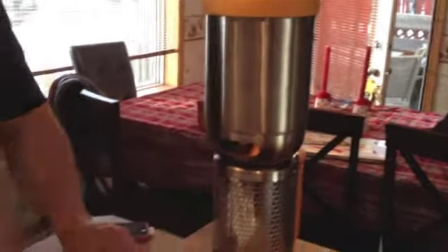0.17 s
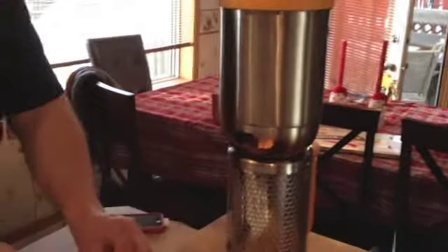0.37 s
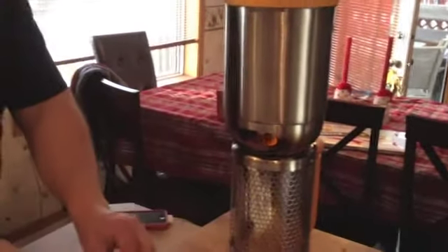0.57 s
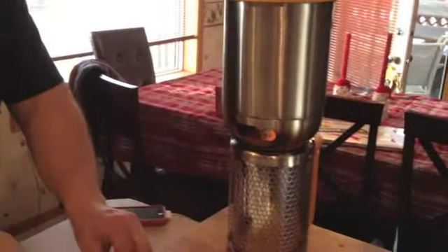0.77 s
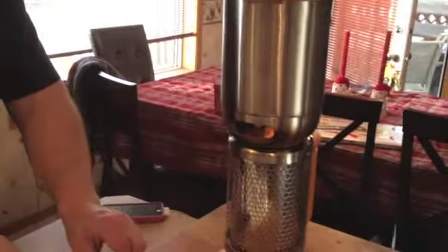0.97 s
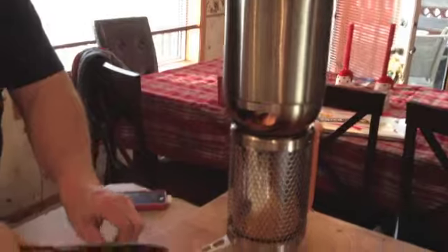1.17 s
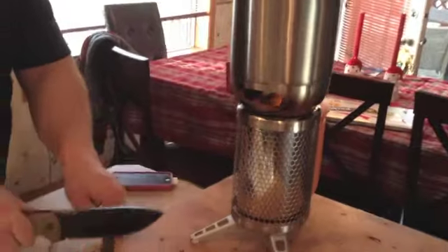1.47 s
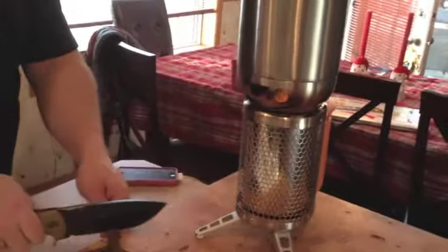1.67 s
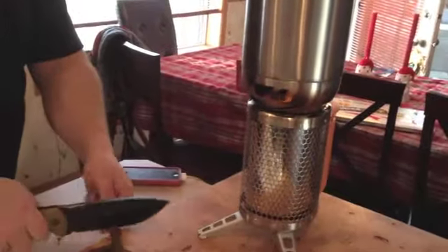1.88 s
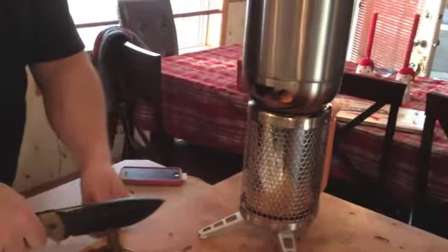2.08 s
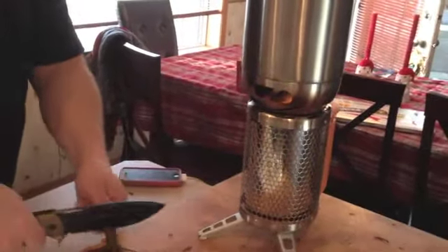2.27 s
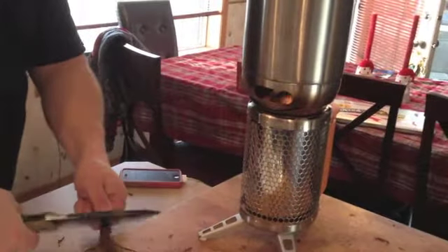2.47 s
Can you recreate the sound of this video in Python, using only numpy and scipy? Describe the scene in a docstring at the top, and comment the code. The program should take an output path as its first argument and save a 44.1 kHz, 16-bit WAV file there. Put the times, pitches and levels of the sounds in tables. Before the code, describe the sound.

One sharp knock cracks on a wood table, then light clicks, while a little stove fan whirs

```python
"""Indoors, on a wooden table, a small camp stove burns: its fan is rushing noise, narrow tones and a thin whine.
One hard knock lands on the tabletop: a sharp crack, ringing wood modes, a noise-built room tail, a steel rattle.
A few light clicks and tiny ticks are short rings with noisy snaps; one faint rustle is a swell of bright hiss.
Automatic gain control ducks after the knock and slowly lets the fan swell back."""
import sys
import numpy as np
from scipy import signal
from scipy.fft import rfft, irfft
from scipy.io import wavfile
from scipy.ndimage import uniform_filter1d

SR = 44100
rng = np.random.default_rng(int(sys.argv[2]) if len(sys.argv) > 2 else 0)


def to_wav(sig):
    """Store sig (one row per channel, or 1-D mono) as 16-bit WAV at the path in sys.argv[1].

    Samples outside -1..1 are clipped; the rate is SR.
    """
    pcm = np.clip(np.atleast_2d(sig), -1, 1) * 32767
    pcm = np.round(pcm).astype(np.int16)
    wavfile.write(sys.argv[1], SR, pcm.T)  # frames by channels


N = 114660  # samples, 2.6 s

# Colour of the air rushing through the stove: hz, relative_db_per_hz
AIR_SPECTRUM = [(30, -70), (60, -65), (90, -25.5), (125, -15), (175, -2), (220, -5.5), (350, -2.5),
                (550, -2.5), (780, -2.5), (1050, -8.5), (1450, -12.5), (2100, -14.5), (2800, -18),
                (3400, -21), (4500, -22.5), (5400, -28.5), (7500, -32), (9300, -40), (12000, -43.5),
                (15000, -41)]
AIR_DB, FLUTTER_DB, FLUTTER_HZ = -45.5, 0.79, 18
# Strength of the draught: time_s, level_db
DRAUGHT = [(0, -0.5), (.6, -0.5), (1.1, 0.5), (1.8, 0), (2.35, .5), (2.6, 0)]
# Narrow tones of the fan and steel burner: pitch_hz, half_width_hz, level_db (before the draught)
WHIR_TONES = [(176.7, 27, -59), (275, 17, -60), (360, 14, -65), (457.8, 1.7, -58), (490.7, 2.6, -56.5),
              (597.5, 10, -61.5), (706, 17, -60.5), (772.6, 11.5, -58), (812, 15, -79.5),
              (1708, 4.7, -68.5), (2920, 17, -70.5), (3940, 24, -74.5)]
WHIR_FOLLOWS = 2.8  # dB of the tones per dB of draught
# Level of the motor's whine, before its flicker: time_s, level_db
WHINE_LEVEL = [(0, -61), (.9, -61.5), (1.25, -59), (1.5, -62.5), (1.7, -80), (2.6, -67)]
WHINE_HZ, WHINE_WANDER_HZ, WHINE_WANDER_RATE_HZ = 1921, 3.5, 6.7
WHINE_FLICKER_DB, WHINE_FLICKER_RATE_HZ = 0.8, 36

# A faint bright rustle: time_s, level_db
RUSTLE_LEVEL = [(1.22, -93), (1.34, -70), (1.46, -86), (1.58, -92)]
RUSTLE_HZ = 12000

# How fast the room's late ring dies: hz, t60_s
ROOM_DECAY = [(60, 0.57), (200, 0.64), (500, 0.46), (1200, 0.54), (2500, 0.37), (6000, 0.27), (13000, 0.19)]
TAIL_BUILD_S = 0.0005
EARLY_DB, EARLY_T60_S = 5, 0.11  # reflections from near surfaces, above the late ring

# Tiny ticks, probably from the burning wood: start_s, ring_db, snap_db
TICKS = [(.560, -72, -52), (1.080, -69, -54), (1.325, -60, -55), (1.5664, -43.5, -59), (1.9045, -56, -51),
         (1.934, -52, -55), (2.088, -60, -55)]
# What a tick rings with: pitch_hz, relative_db, t60_s
TICK_MODES = [(4070, 0, 0.0056), (8260, -6, .008), (9600, -7, 0.0045), (14500, -10, 0.0023)]
# Light clicks of hard things on the table: start_s, ring_db, snap_db
CLICKS = [(.3072, -43, -29), (2.5003, -52, -43), (2.5079, -53, -46), (2.5094, -22, -39)]
# What a click rings with: pitch_hz, relative_db, t60_s
CLICK_MODES = [(2550, -17, 0.01), (4040, -2.5, 0.0034), (4550, -1, 0.0041), (5800, -11, 0.0021),
               (7700, -13, 0.0038), (10500, -29, 0.0041)]
# Colour of the room's answer to small contacts: hz, relative_db_per_hz
CONTACT_TAIL = [(300, -26), (1500, -12), (4300, 0.5), (7200, -2), (9500, -11), (12000, -11), (15000, -15)]
TICK_ROOM_DB, CLICK_ROOM_DB = -22, -31  # relative to each contact
SNAP_T60_S, SNAP_LOW_HZ, SNAP_HIGH_HZ = 0.014, 2200, 10600

# Colour of the steel stove's brief buzz after the knock: hz, relative_db_per_hz
RATTLE_SPECTRUM = [(700, 1), (1500, 9), (2800, 3), (4500, -0.5), (7000, -6), (9500, -15), (11500, -18),
                   (14000, -19)]
RATTLE_DB, RATTLE_HOLD_S, RATTLE_T60_S = -40.5, 0.12, 0.23
RATTLE_TOUCHES_PER_S = 16000

KNOCK_S, TABLE_LAG_S = 0.225, 0.00129
PUSH_LOW_HZ, PUSH_HIGH_HZ = 84, 1510
# The hard contact: pitch_hz, level_db, t60_s
CRACK_MODES = [(2097, -7.5, 0.02), (2550, -2.5, 0.0054), (3740, -7.5, 0.007), (4400, -6.5, 0.0058),
               (5060, -10, 0.0073), (7000, -12.5, 0.003), (13800, -21, 0.0072)]
# The tabletop and what stands on it: pitch_hz, relative_db, t60_s
TABLE_MODES = [(38, -33, 0.16), (139.7, -25, 0.39), (166.2, -19, 0.38), (195, -12.5, 0.19),
               (233, -6, 0.067), (259.7, -20, 0.31), (286.5, -19, 0.26), (354.3, -16, .16),
               (426, -19, 0.35), (480, -20.5, 0.25), (557.4, -21.5, 0.34), (743, -27, 0.27),
               (1000, -40, 0.31), (1170, -23.5, 0.45), (1518, -20, 0.1)]
# Colour of the room's answer to the knock: hz, relative_db_per_hz
KNOCK_TAIL = [(30, -32), (70, -31), (130, -2.5), (230, -2.5), (480, 2), (700, -3), (1150, -5.5),
              (1400, -11), (2200, -10.5), (3000, -17.5), (4500, -23), (7000, -26), (9500, -36),
              (11500, -54), (13500, -39), (16000, -57)]
KNOCK_TAIL_DB = -17

# The gain falls by the slope in dB for each dB above the threshold
GAIN_THRESHOLD_DB, GAIN_SLOPE = -23, 0.5
GAIN_LAG_S, GAIN_ATTACK_S, GAIN_RELEASE_DB_PER_S = 0.037, 0.071, 4.5
CEILING, CUTOFF_HZ = 0.71, 15500


def from_db(db):
    """Decibels to gain."""
    return 10 ** (np.asarray(db) / 20)


def rms_one(x):
    """Scale to unit rms."""
    return x / np.sqrt(np.mean(x ** 2) + 1e-20)


def seconds():
    """The time of every sample."""
    return np.arange(N) / SR


def at_time(points):
    """Draw a straight-line envelope through (time, value) points."""
    return np.interp(seconds(), *np.transpose(points))


def at_hz(points, hz):
    """Read a table on a log-frequency axis."""
    table_hz, value = np.transpose(points)
    return np.interp(np.log(np.maximum(hz, 1)), np.log(table_hz), value)


def coloured(x, shape):
    """Weight a signal's spectrum by shape(Hz), then scale to unit rms."""
    hz = np.fft.rfftfreq(N, 1 / SR)
    return rms_one(irfft(rfft(x) * shape(hz), N))


def noise(shape):
    """Steady noise of unit rms, coloured by shape(Hz)."""
    return coloured(rng.standard_normal(N), shape)


def drift(rate_hz):
    """Slow random motion of unit rms, weaker above the rate."""
    return noise(lambda f: 1 / (1 + (f / rate_hz) ** 2))


def strikes(rows):
    """One impulse for each (start_s, level_db)."""
    force = np.zeros(N)
    for start_s, level_db in rows:
        force[int(np.clip(start_s * SR, 0, N - 1))] += from_db(level_db)
    return force


def ring(force, modes):
    """Damped resonances driven by a force, with alternating signs."""
    out = np.zeros(N)
    for k, (hz, level_db, t60) in enumerate(modes):
        r = np.exp(-np.log(1000) / (t60 * SR))
        w = 2 * np.pi * hz / SR
        mode = signal.lfilter([0, np.sin(w)], [1, -2 * r * np.cos(w), r * r], force + 1e-18)
        out += (-1) ** k * from_db(level_db) * mode
    return out


def fan():
    """Fluttering air and narrow wavering tones follow the draught; the motor whines above them."""
    draught_db = at_time(DRAUGHT)
    air_db = AIR_DB + draught_db + FLUTTER_DB * drift(FLUTTER_HZ)
    air = from_db(air_db) * noise(lambda f: from_db(at_hz(AIR_SPECTRUM, f)))

    whir = np.zeros(N)
    for hz, width, level_db in WHIR_TONES:
        whir += from_db(level_db) * noise(lambda f: 1 / (1 + ((f - hz) / width) ** 2))
    whir *= from_db(WHIR_FOLLOWS * draught_db)

    whine_hz = WHINE_HZ + WHINE_WANDER_HZ * drift(WHINE_WANDER_RATE_HZ)
    whine_db = at_time(WHINE_LEVEL) + WHINE_FLICKER_DB * drift(WHINE_FLICKER_RATE_HZ)
    turns = np.cumsum(whine_hz) / SR
    whine = np.sqrt(2) * from_db(whine_db) * np.sin(2 * np.pi * turns)  # root 2: the level is rms
    return air + whir + whine


def rustle():
    """A short swell of very fine hiss."""
    hiss = noise(lambda f: 1 / (1 + (2 * (f / RUSTLE_HZ - 1)) ** 4))
    return from_db(at_time(RUSTLE_LEVEL)) * hiss


def room(force, spectrum):
    """Dense reflections of each blow: a quick early part, then every octave dies at its own rate."""
    r = np.exp(-1 / (TAIL_BUILD_S * SR))
    energy = signal.lfilter([1 - r], [1, -r], force ** 2 + 1e-18)

    def dying(t60):
        return signal.lfilter([1], [1, -np.exp(-2 * np.log(1000) / (t60 * SR))], energy)

    early = from_db(EARLY_DB) ** 2 * dying(EARLY_T60_S)
    wash = rfft(noise(lambda f: from_db(at_hz(spectrum, f))))
    octave = np.log2(np.maximum(np.fft.rfftfreq(N, 1 / SR), 1))
    out = np.zeros(N)
    for k in range(5, 15):  # overlapping octaves centred from 32 Hz to 16 kHz
        band = irfft(wash * np.maximum(1 - abs(octave - k), 0), N)
        late = dying(at_hz(ROOM_DECAY, 2 ** k))
        out += band * np.sqrt(early + late)
    return out


def snap(force):
    """The brief broad rasp of two hard surfaces meeting: decaying, band-passed noise."""
    t = seconds()[:SR // 20]
    burst = rng.standard_normal(len(t)) * np.exp(-np.log(1000) * t / SNAP_T60_S)
    band = signal.butter(1, [SNAP_LOW_HZ, SNAP_HIGH_HZ], "band", fs=SR)
    return signal.lfilter(*band, signal.fftconvolve(force, burst)[:N])


def contacts(rows, modes, room_db):
    """Each contact is a short ring, a snap and a faint wash of room."""
    rows = np.array(rows)
    blows = strikes(rows[:, [0, 1]])
    rasps = strikes(rows[:, [0, 2]])
    wash = from_db(room_db) * room(np.hypot(blows, rasps), CONTACT_TAIL)
    return ring(blows, modes) + snap(rasps) + wash


def ticks():
    """Tiny bright contacts with very short high resonances."""
    return contacts(TICKS, TICK_MODES, TICK_ROOM_DB)


def clicks():
    """Hard things touch the table and excite short bright resonances."""
    return contacts(CLICKS, CLICK_MODES, CLICK_ROOM_DB)


def rattle():
    """Dense little touches of loose steel hold for a moment after the knock, then die away."""
    age = seconds() - KNOCK_S
    touches = rng.standard_normal(N) * (rng.random(N) < RATTLE_TOUCHES_PER_S / SR)
    buzz = coloured(touches, lambda f: from_db(at_hz(RATTLE_SPECTRUM, f)))
    fade = np.exp(-np.log(1000) * np.maximum(age - RATTLE_HOLD_S, 0) / RATTLE_T60_S)
    return from_db(RATTLE_DB) * buzz * (age > 0) * fade


def knock():
    """A sharp crack at the contact, then a softer push sets the tabletop ringing; the room answers."""
    blow = strikes([(KNOCK_S, 0)])
    band = signal.butter(1, [PUSH_LOW_HZ, PUSH_HIGH_HZ], "band", fs=SR)
    push = signal.lfilter(*band, strikes([(KNOCK_S + TABLE_LAG_S, 0)]))
    tail = from_db(KNOCK_TAIL_DB) * room(blow, KNOCK_TAIL)
    return ring(blow, CRACK_MODES) + ring(push, TABLE_MODES) + tail


def scene():
    """Stove and table, layered from the fan up to the knock."""
    return (fan() + rustle() + ticks() + clicks() + rattle() + knock())[None]


def gain_control(x):
    """Loud sound turns the gain down after a short lag; it creeps back at a steady rate."""
    power = uniform_filter1d(x ** 2, size=882, origin=440)  # mean over the last 20 ms
    level_db = 10 * np.log10(np.maximum(power, 1e-12))
    over_db = np.maximum(level_db - GAIN_THRESHOLD_DB, 0)
    over_db = np.interp(seconds() - GAIN_LAG_S, seconds(), over_db)
    # a running peak on a rising ramp gives a straight-line release
    release = GAIN_RELEASE_DB_PER_S * seconds()
    held_db = np.maximum.accumulate(GAIN_SLOPE * over_db + release) - release
    r = np.exp(-1 / (GAIN_ATTACK_S * SR))
    cut_db = signal.lfilter([1 - r], [1, -r], held_db)
    return x * from_db(-cut_db)


def record(dry):
    """Gain control, rounded peaks and a steep cut of the top."""
    x = CEILING * np.tanh(gain_control(dry[0]) / CEILING)
    top_cut = signal.ellip(10, 0.1, 80, CUTOFF_HZ, fs=SR, output="sos")
    return signal.sosfilt(top_cut, x)[None]


dry = scene()
out = record(dry)
to_wav(out)
```